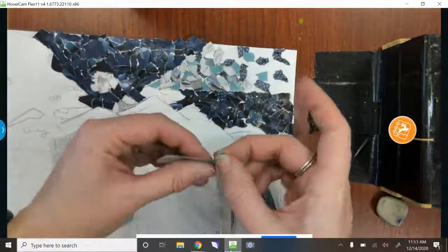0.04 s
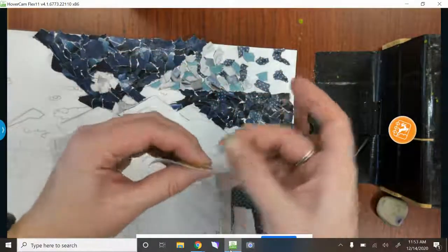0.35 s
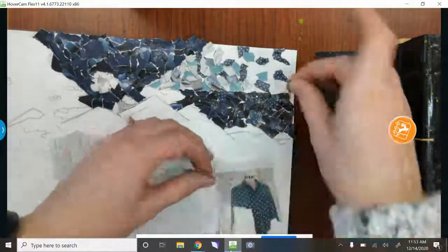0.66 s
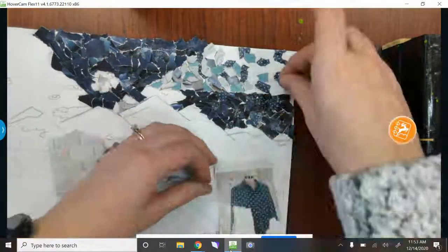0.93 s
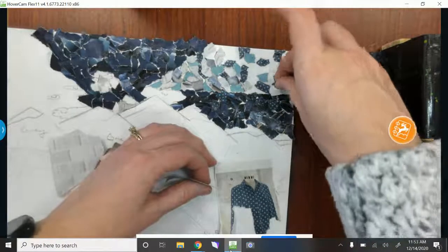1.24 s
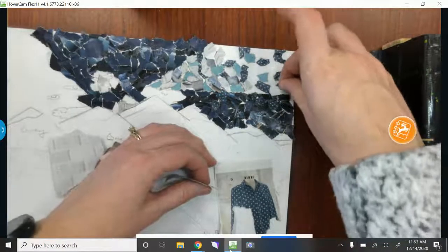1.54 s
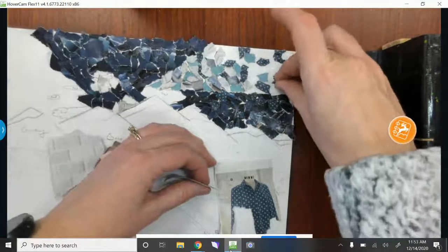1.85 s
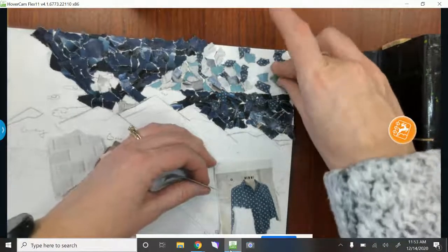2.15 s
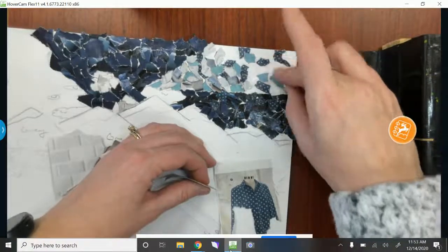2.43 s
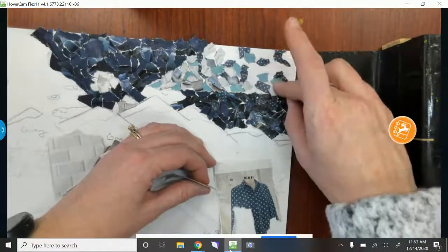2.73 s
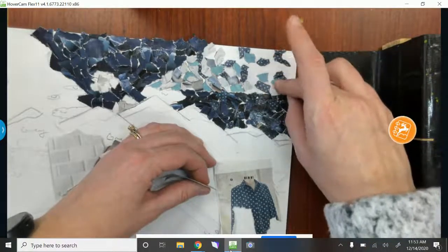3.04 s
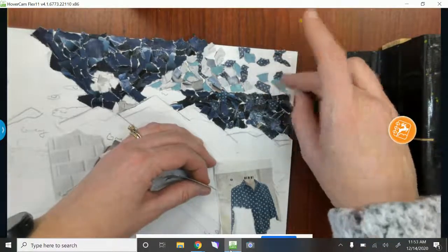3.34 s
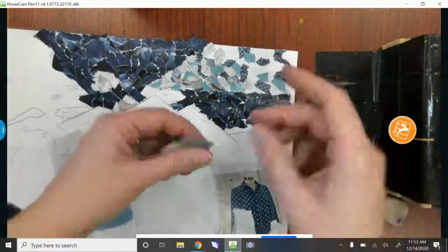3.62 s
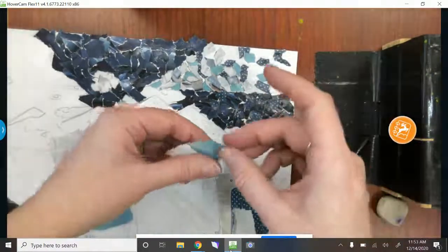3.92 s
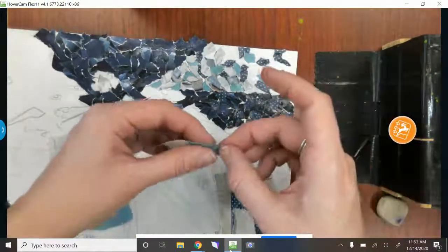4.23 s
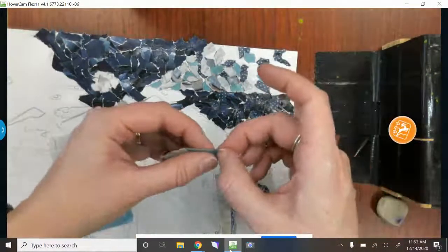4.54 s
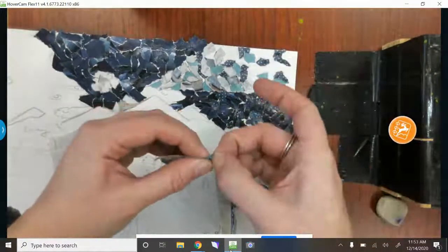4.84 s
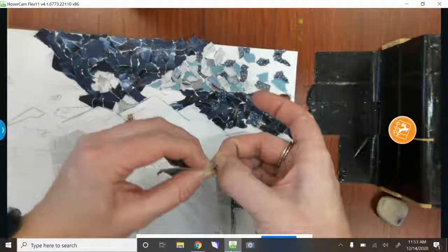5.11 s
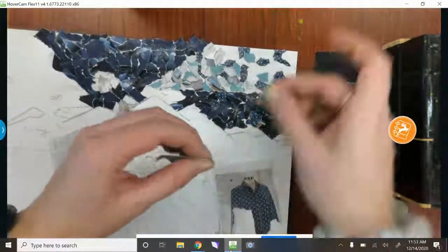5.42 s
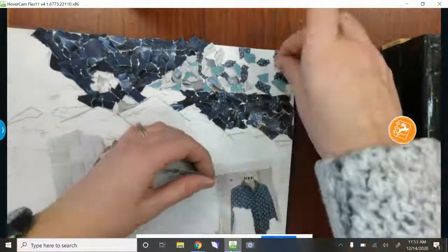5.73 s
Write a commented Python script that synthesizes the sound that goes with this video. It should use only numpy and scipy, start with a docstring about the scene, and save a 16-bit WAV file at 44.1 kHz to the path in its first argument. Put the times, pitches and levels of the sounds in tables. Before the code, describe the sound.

Two quick, bright paper rips about five seconds apart, with faint fingertip taps and paper being rubbed flat in a small room.

```python
"""Two quick, bright rips: fingers tear a small scrap from a glossy magazine page for a collage.
Each rip is a run of breaking fibres with a few sharp snaps. The scrap scuffs the sheet, a fingertip
knocks on the wooden table and rubs the paper flat, and near five seconds a second scrap is torn off.
Underneath lie a brushing wool sleeve, the air and rumble of a small room and a low drone that soon
dies away, all heard through a narrow-band microphone."""
import sys
import numpy as np
from scipy import signal
from scipy.io import wavfile
from scipy.ndimage import uniform_filter1d

SR = 44100
rng = np.random.default_rng(int(sys.argv[2]) if len(sys.argv) > 2 else 0)


def generate_wav(signal):
    """Clip the signal to [-1, 1] and save it as 16-bit WAV at the path in sys.argv[1]."""
    frames = np.transpose(np.atleast_2d(signal))
    scaled = np.clip(frames, -1, 1) * 32767
    pcm = np.round(scaled).astype(np.int16)
    wavfile.write(sys.argv[1], SR, pcm)


N = 254611
TIME = np.arange(N) / SR

# tone of the room air (frequency [Hz], level [dB])
AIR_SPECTRUM = [(41, -22.5), (70, -7), (90, -4.5), (259, -11.5), (405, -28), (502, -28.5), (727, -32),
                (1050, -31), (1550, -33), (2120, -31.5), (5210, -32), (6210, -29), (7400, -40),
                (9620, -75.5), (16300, -120)]
# tone of the low rumble (frequency [Hz], level [dB])
RUMBLE_SPECTRUM = [(8.8, -32), (15, 2.5), (29, 4), (76, -24), (110, -24), (140, -46.5), (240, -120)]
# swells of the rumble (middle [s], length [s], level [dB])
RUMBLE_SWELLS = [(0.14, .3, -46.5), (0.51, 0.22, -46), (1.07, .18, -48), (1.72, 0.1, -47.5),
                 (2.16, 0.19, -50), (2.91, 0.093, -45.5), (3.35, 0.26, -47.5), (3.79, 0.34, -44.5),
                 (4.32, 0.087, -50.5), (4.74, 0.11, -54.5), (5.18, 0.2, -43.5), (5.5, 0.25, -44)]
# reverb time of the small room (frequency [Hz], t60 [s])
ROOM_DECAY = [(150, .3), (1000, 0.24), (1750, 0.29), (3500, 0.17), (7000, .25)]
# hands and sleeve moving over the table (middle [s], length [s], wool level [dB], swish level [dB])
SLEEVE_MOVES = [(0.07, 0.7, -66.5, -72), (0.48, 0.49, -71, -70.5), (1.01, 0.27, -73.5, -68.5),
                (1.68, 0.33, -85.5, -74.5), (2.55, 0.31, -69, -74), (3.22, 0.16, -71.5, -83),
                (3.55, 0.19, -64, -78), (3.80, 0.31, -68.5, -85), (4.2, 0.33, -72.5, -88),
                (5.55, 0.66, -76.5, -66)]
# soft, hollow brush of wool (frequency [Hz], level [dB])
WOOL_SPECTRUM = [(80, -8.5), (135, 6), (190, -1.5), (280, 0.5), (450, -1), (700, -7), (1100, -19),
                 (3000, -32.5)]
# dry swish of skin and paper (frequency [Hz], level [dB])
SWISH_SPECTRUM = [(400, -19.5), (900, -0.5), (1400, 0), (2300, -5), (4000, -6.5), (7000, -8)]
# finger rubbing the scrap flat
# (start [s], end [s], firmest point [0-1], hiss steepness [exponent], hiss level [dB], body level [dB])
FINGER_STROKES = [(1.514, 1.876, 0.28, 1.18, -62.5, -61.5), (2.081, 2.212, 0.48, 1.23, -73.5, -70.5),
                  (2.285, 2.793, 0.46, 1.44, -48.5, -57), (3.201, 3.438, 0.67, 0.7, -54.5, -60)]
# hiss of skin on paper (frequency [Hz], level [dB])
SKIN_SPECTRUM = [(2060, -40.5), (3500, -6.5), (4200, -2), (4340, -3), (4700, -1.5), (6150, 5), (6950, 2.5),
                 (7260, -3), (7400, -46), (9620, -36), (16300, -120)]
# body of the pressed sheet (frequency [Hz], level [dB])
SHEET_SPECTRUM = [(180, -28.5), (300, -4.5), (328, -27), (483, -7), (832, -5.5), (911, -1), (1010, -2.5),
                  (1130, -1), (1380, -2), (1780, -6), (2390, 1), (3030, -3), (4500, -8), (5850, -58),
                  (9900, -120)]
# fingertip and nail on the table (time [s], peak [dB], wood ring against skin slap [dB])
FINGER_KNOCKS = [(0.809, -46, 14), (0.8561, -35, -7.5), (0.8680, -37.5, -6.5), (0.8785, -44, 8),
                 (3.104, -50, -5), (3.183, -64, 4.5), (3.314, -49.5, -2), (3.395, -48, -3),
                 (3.511, -54, 11), (3.583, -64, -6.5)]
# modes of the table top (frequency [Hz], level [dB], t60 [s])
WOOD_MODES = [(136, 10.5, 0.12), (207.8, 2.5, 0.23), (343.4, 1.5, 0.13), (437, 1, 0.056), (856, -2, 0.13),
              (984, -7.5, 0.065), (1230, -3, 0.053), (1335, -22, 0.059), (1574, -2.5, 0.11),
              (2430, -10, 0.11)]
# a paper edge dragged over the sheet
# (start [s], end [s], level [dB], low ring [Hz], its lift [dB], high ring [Hz], its lift [dB])
EDGE_SCUFFS = [(0.272, 0.28, -41.5, 4500, 1.5, 6330, 28.5), (0.783, 0.827, -51, 3890, 8.5, 5880, 11.5),
               (0.846, 0.894, -57.5, 3920, -3, 6500, -2), (3.102, 3.118, -59, 2170, 4, 6220, 8),
               (3.451, 3.475, -55, 1940, -3, 5000, 8), (3.465, 3.475, -45, 3630, 11.5, 6840, 11.5),
               (3.503, 3.530, -62.5, 1930, 11, 5040, 7), (3.525, 3.625, -67, 2070, 1, 6720, 13),
               (4.037, 4.108, -66, 5350, 8, 6740, 13.5), (4.852, 4.916, -73, 4290, 6, 6540, 17),
               (4.982, 5.017, -67.5, 1640, 5.5, 6280, 23), (5.041, 5.078, -54.5, 5140, 9, 6160, 13.5),
               (5.208, 5.211, -43, 2060, 1, 2900, 12), (5.635, 5.684, -52.5, 4000, 11, 6600, 6.5),
               (5.724, 5.731, -60, 4070, -2, 6500, 15)]
# fibre bundles and creases popping (time [s], peak [dB], body below 4.5 kHz [dB], spray decay [s])
FIBRE_SNAPS = [(0.1088, -49, 1, 0.001), (0.1214, -24, -3, 0.00059), (0.1283, -12.5, 5, 0.0006),
               (0.1293, -12.5, -9.5, 0.001), (0.1416, -26.5, 2, .0008), (0.2860, -28, -21, .0012),
               (0.2994, -24.5, -20, .001), (0.3055, -26, -4, 0.00076), (0.3072, -21.5, -20.5, 0.00087),
               (0.31, -24.5, -2, 0.00091), (0.3176, -28, -11, 0.00079), (0.786, -39, 0, .0024),
               (0.808, -37.5, 4.5, 0.0017), (0.8574, -38.5, 3.5, 0.0024), (1.552, -48.5, -10, .005),
               (2.335, -52, -1.5, 0.0037), (3.104, -47.5, -11.5, .0029), (3.511, -47, 2, .0011),
               (5.045, -42.5, -1.5, 0.0068), (5.1205, -45, 11, .002), (5.1863, -31, 0, 0.00076),
               (5.209, -26, -9, 0.0032), (5.2122, -25, -28, .001)]
# bending modes of a taut scrap (frequency [Hz], level [dB], t60 [s])
PAPER_MODES = [(2820, -13, 0.0081), (3550, -3, 0.01), (4930, -3, 0.0089), (6264, 0, 0.0091),
               (6414, -10, 0.013), (7044, -13, 0.00887)]
# rips, one list per pull on the paper (start [s], rise [s], hold [s], release [s], level [dB])
PULLS = [
    [(0.117, 0.012, 0.02, .024, -33), (0.170, 0.011, .004, 0.068, -49)],
    [(0.277, 0.02, 0.013, 0.025, -32.5), (0.322, .006, .01, 0.049, -54)],
    [(5.060, 0.034, 0.023, .05, -54.5), (5.105, 0.047, .02, .03, -44.5)],
    [(5.170, .012, 0.029, .012, -39), (5.203, 0.0052, 0.0033, 0.0059, -27.5),
     (5.208, 0.0076, .009, 0.0057, -41.5)],
]
# tone of the held scrap, one list per pull (frequency [Hz], level [dB])
SCRAP_SPECTRA = [
    [(530, -67), (900, -43), (1310, -20.5), (1510, -24.5), (1700, -13), (2290, -31), (2780, -13),
     (3010, -20), (3920, -9.5), (4600, -15.5), (4890, -3), (5480, -13), (5990, 6), (6660, -6.5),
     (7400, -17), (9620, -48.5), (16300, -120)],
    [(710, -59), (1200, -44.5), (2240, -28.5), (2570, -33), (2710, -17), (3060, -7.5), (3280, -9),
     (3460, -13), (5290, -15.5), (5540, -4), (6160, 1), (6550, -1.5), (7400, -12), (9620, -37),
     (16300, -120)],
    [(530, -58), (900, -16.5), (1330, -33), (1670, -8.5), (2190, -14), (2440, -31), (3170, -13), (3440, -1),
     (4030, -3.5), (4440, -9), (4850, -6.5), (6370, 5), (7400, -11.5), (9620, -49), (16300, -120)],
    [(240, -74), (400, -38), (693, -18), (1280, -29), (1800, -18), (1960, -19.5), (2210, -10.5),
     (2560, -25), (2890, -11.5), (3470, -10.5), (3780, -30), (4270, -8.5), (5390, -11.5), (6630, 4.5),
     (7400, -7), (9620, -41), (16300, -120)],
]


def gain_of(db):
    """Decibels to amplitude."""
    return 10 ** (np.asarray(db) / 20)


def unit_rms(x):
    """Scales a signal to rms 1."""
    return x / np.sqrt(np.mean(x ** 2) + 1e-20)


def curve_at(points, hz):
    """Reads a (frequency, value) curve on a log-frequency axis."""
    freqs, values = np.transpose(points)
    return np.interp(np.log(hz + 1), np.log(freqs + 1), values)


def arch(start, end, crest=0.5):
    """A fade from 0 up to 1 and back, peaking at the share `crest` of its span."""
    top = start + crest * (end - start)
    return np.sin(np.pi / 2 * np.interp(TIME, [start, top, end], [0, 1, 0]))


def swells(rows, rest_db, column=2):
    """Gain of smooth swells (middle, length, levels...) over a resting level; their powers add."""
    power = sum((gain_of(row[column]) * arch(row[0] - row[1] / 2, row[0] + row[1] / 2)) ** 2
                for row in rows)
    return np.sqrt(gain_of(rest_db) ** 2 + power)


def add(mix, start, sound):
    """Lays a sound into the mix at `start` seconds."""
    part = mix[round(start * SR):][:len(sound)]
    part += sound[:len(part)]


def colour(x, spectrum, size=4096):
    """Minimum-phase EQ that gives x the spectrum's shape, at rms 1."""
    db = np.maximum(curve_at(spectrum, abs(np.fft.fftfreq(size, 1 / SR))), -100)
    response = np.exp(np.conj(signal.hilbert(np.log(gain_of(db)))))
    taps = np.fft.ifft(response).real[:size // 2]
    return unit_rms(signal.oaconvolve(x, taps)[:len(x)])


def resonate(x, hz, width_hz, passes=1):
    """A two-pole resonance of gain 1; more passes steepen its skirts."""
    for _ in range(passes):
        x = signal.lfilter(*signal.iirpeak(hz, hz / width_hz, SR), x)
    return x


def crackle(per_s, spread_db):
    """Random clicks of either sign, most small and a few large."""
    sizes = gain_of(spread_db * np.minimum(rng.exponential(1, N), 3))
    signs = rng.choice([-1, 1], N)
    return unit_rms(sizes * signs * (rng.random(N) < per_s / SR))


def steadied(x, samples):
    """Keeps the grain but holds the short-term power at 1."""
    return x / np.sqrt(abs(uniform_filter1d(x ** 2, samples)) + 1e-6)


def shifting(x, depth_db, width_hz, hold_s):
    """Resonances that come and go as the point of contact moves."""
    frame, hop = 1024, 256
    bands = signal.stft(x, SR, nperseg=frame, noverlap=frame - hop)[2]
    patches = rng.standard_normal(bands.shape)
    patches = uniform_filter1d(patches, round(width_hz * frame / SR), axis=0)
    patches = uniform_filter1d(patches, round(hold_s * SR / hop), axis=1)
    bands *= gain_of(depth_db * unit_rms(patches))
    return unit_rms(signal.istft(bands, SR, nperseg=frame, noverlap=frame - hop)[1][:len(x)])


def background():
    """Room air, a lumpy rumble and a low, wavering drone that stops early and dies away."""
    drone_hz, drone_stop_s, fade_db_per_s = 61.95, 0.82, 67
    air = gain_of(-66.5) * colour(rng.standard_normal(N), AIR_SPECTRUM)
    rumble = colour(rng.standard_normal(N), RUMBLE_SPECTRUM, size=32768)
    rumble = steadied(rumble, samples=4000) * swells(RUMBLE_SWELLS, rest_db=-57)
    drone = resonate(rng.standard_normal(N), drone_hz, width_hz=6.6, passes=2)
    drone_db = -55.5 - fade_db_per_s * np.maximum(TIME - drone_stop_s, 0)
    return air + rumble + gain_of(drone_db) * steadied(drone, samples=9000)


def room(x):
    """Sparse reflections from table and walls, each band dying at its own speed."""
    echoes_per_s, predelay_s = 3000, 0.004
    t = TIME[:SR // 2]
    echoes = rng.choice([-1., 1.], len(t)) * (rng.random(len(t)) < echoes_per_s / SR) * (t > predelay_s)
    echoes *= 1 + 3 * np.exp(-t / 0.023)  # near surfaces answer first and loudest
    hz, age, bands = signal.stft(echoes, SR, nperseg=256)
    bands *= gain_of(-60 * age / curve_at(ROOM_DECAY, hz)[:, None])
    tail = signal.istft(bands, SR, nperseg=256)[1]
    return signal.fftconvolve(x, tail / np.linalg.norm(tail))[:N]


def sleeve():
    """Wool brushes the table, skin and paper add a drier swish; the hands are never quite still."""
    wool = colour(crackle(per_s=750, spread_db=2), WOOL_SPECTRUM)
    wool = shifting(wool, depth_db=4.5, width_hz=90, hold_s=0.05)
    swish = colour(crackle(per_s=1600, spread_db=1), SWISH_SPECTRUM)
    swish = shifting(swish, depth_db=5.5, width_hz=170, hold_s=0.08)
    return (wool * swells(SLEEVE_MOVES, rest_db=-76, column=2)
            + swish * swells(SLEEVE_MOVES, rest_db=-78, column=3))


def strokes():
    """Skin slides over paper: countless tiny slips hiss, and the pressed sheet adds a lower body."""
    body_steepness = 1.63
    hiss = colour(crackle(per_s=7000, spread_db=3.5), SKIN_SPECTRUM)
    hiss = shifting(hiss, depth_db=2.5, width_hz=160, hold_s=0.098)
    body = colour(crackle(per_s=4000, spread_db=4.5), SHEET_SPECTRUM)
    body = shifting(body, depth_db=4, width_hz=170, hold_s=0.067)
    out = np.zeros(N)
    for start, end, crest, hiss_steepness, hiss_db, body_db in FINGER_STROKES:
        pressure = arch(start, end, crest)
        out += gain_of(hiss_db) * pressure ** hiss_steepness * hiss
        out += gain_of(body_db) * pressure ** body_steepness * body
    return out


def knocks():
    """A fingertip slaps the table top, which rings briefly, damped by the resting hands."""
    slap_eq = [(150, -18.5), (380, 0), (580, -20), (900, 8), (1100, 4), (1500, -5.5),
               (2000, -23.5), (6000, -31)]
    out, t = np.zeros(N), TIME[:SR // 4]
    for start, peak_db, ring_db in FINGER_KNOCKS:
        ring = sum(gain_of(db - 60 * t / t60) * np.sin(2 * np.pi * (hz * t + rng.random()))
                   for hz, db, t60 in WOOD_MODES)
        slap = colour(rng.standard_normal(len(t)) * np.exp(-t / 0.0015), slap_eq)
        knock = gain_of(ring_db) * unit_rms(ring) + slap
        knock *= 1 - np.exp(-t / 0.0015)  # the finger pad cushions the attack
        add(out, start, gain_of(peak_db) * knock / abs(knock).max())
    return out


def cupped_hands(x):
    """The hollow between fingers and palm rings along with the paper held in it."""
    return x + gain_of(2.5) * resonate(x, hz=1734, width_hz=90)


def scuffs():
    """The edge of a scrap catches and slips; its free part rings at two pitches."""
    edge_eq = [(200, -6.5), (1200, -10.5), (2000, -4), (4000, -1.5), (7200, 3), (8000, -43)]
    grain = colour(crackle(per_s=3500, spread_db=2.5), edge_eq)
    grain = shifting(grain, depth_db=2.5, width_hz=170, hold_s=0.08)
    out = np.zeros(N)
    for start, end, db, low_hz, low_db, high_hz, high_db in EDGE_SCUFFS:
        samples = max(round((end - start) * SR), 200)
        slips = grain[round(start * SR):][:samples]
        ring = sum(gain_of(lift_db) * resonate(slips, hz, width_hz=570, passes=2)
                   for hz, lift_db in [(low_hz, low_db), (high_hz, high_db)])
        fades = signal.windows.tukey(len(slips), 0.2)
        add(out, start, gain_of(db) * unit_rms(slips + ring) * fades)
    return out


def snaps():
    """A fibre bundle lets go: the scrap's modes ring, with a short spray of single fibres."""
    spray_eq = [(2000, -17.5), (3000, -0.5), (5300, -7), (6300, 9), (7200, -5), (8000, -46)]
    out, t = np.zeros(N), TIME[:2048]
    for start, peak_db, body_db, decay_s in FIBRE_SNAPS:
        ring = np.zeros(len(t))
        for hz, db, t60 in PAPER_MODES:
            detuned_hz = hz * (1 + 0.008 * rng.standard_normal())
            ring += gain_of(db - 60 * t / t60) * np.sin(2 * np.pi * (detuned_hz * t + rng.random()))
        spray = colour(rng.standard_normal(len(t)) * np.exp(-t / decay_s), spray_eq)
        snap_eq = [(700, body_db - 21.5), (2400, body_db - 5), (4000, body_db),
                   (5500, 3), (7300, 1), (8000, -30)]
        snap = colour(unit_rms(ring) + 0.63 * spray, snap_eq)
        snap *= 1 - np.exp(-t / (0.5 * decay_s))  # a slower break also starts more softly
        add(out, start, gain_of(peak_db) * snap / abs(snap).max())
    return out


def rip_envelope(start, rise, hold, release, db):
    """The pull builds, the paper runs, and the tension lets go."""
    ramp_db = 24  # climbed during the rise, lost again during the release
    building = np.maximum(1 - (TIME - start) / rise, 0)
    letting_go = np.maximum(TIME - start - rise - hold, 0) / release
    return gain_of(db - ramp_db * np.minimum(building + letting_go, 10))


def tears():
    """Fibres break one after another and ring the scrap, harder as the pull grows."""
    out = np.zeros(N)
    for rips, spectrum in zip(PULLS, SCRAP_SPECTRA):
        fibres = colour(crackle(per_s=3000, spread_db=3.5), spectrum)
        fibres = shifting(fibres, depth_db=2, width_hz=200, hold_s=0.082)
        force = np.max([rip_envelope(*rip) for rip in rips], axis=0)
        out += force * steadied(fibres, samples=300)
    return out


def scene():
    """Mono mix: the tearing is close and fairly dry, the table work further off with more room."""
    near = tears() + cupped_hands(snaps())
    far = cupped_hands(scuffs()) + knocks() + strokes()
    reverb = room(gain_of(-15) * near + gain_of(-6.5) * far)
    return (near + far + reverb + sleeve() + background())[None]


def record(dry):
    """The narrow-band microphone cuts the top end steeply."""
    cutoff_hz = 7310
    lowpass = signal.firwin(401, cutoff_hz, window=("kaiser", 8), fs=SR)
    return signal.oaconvolve(dry, lowpass[None], "same")


dry = scene()
out = record(dry)
generate_wav(out)
```